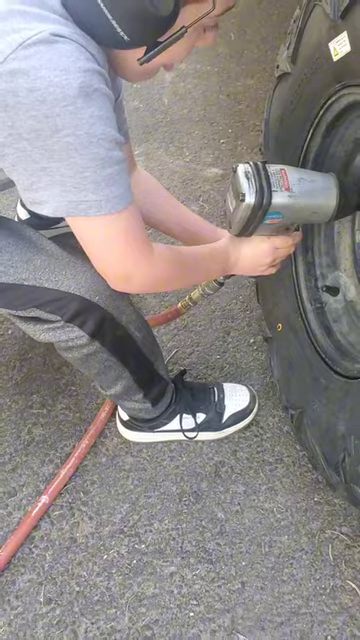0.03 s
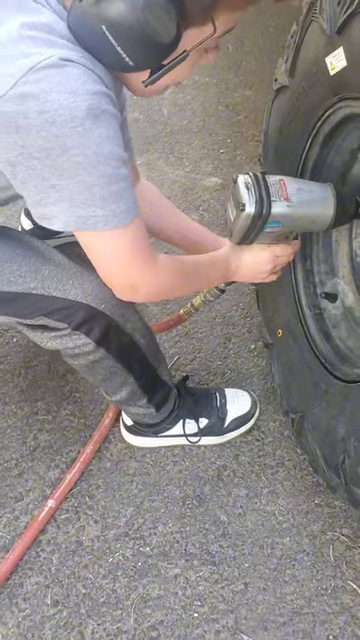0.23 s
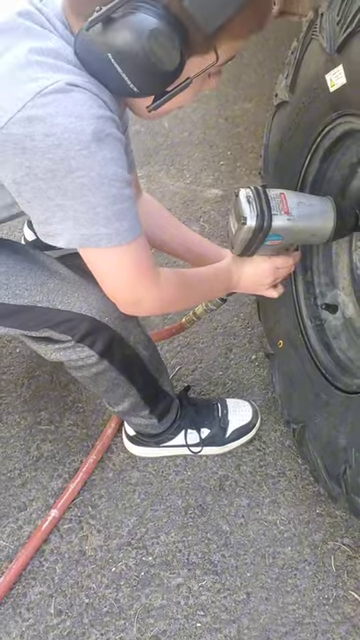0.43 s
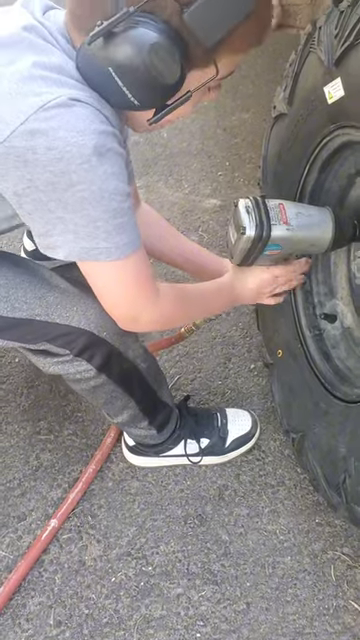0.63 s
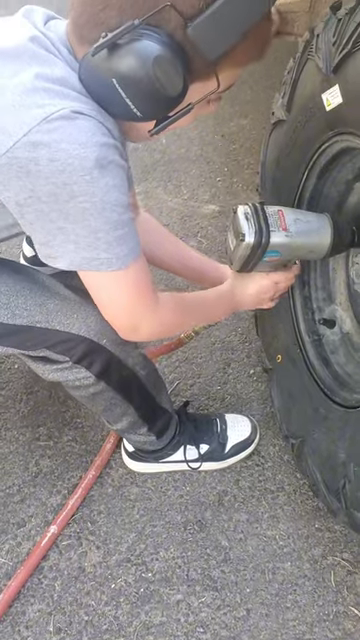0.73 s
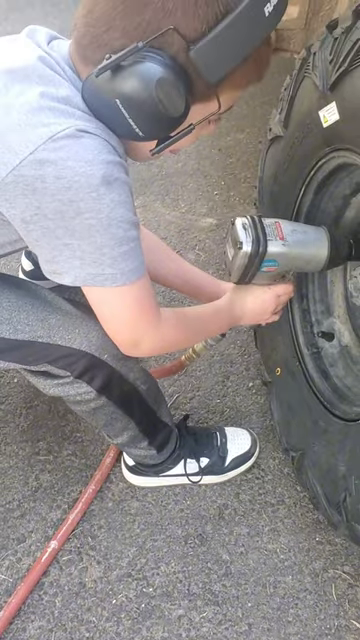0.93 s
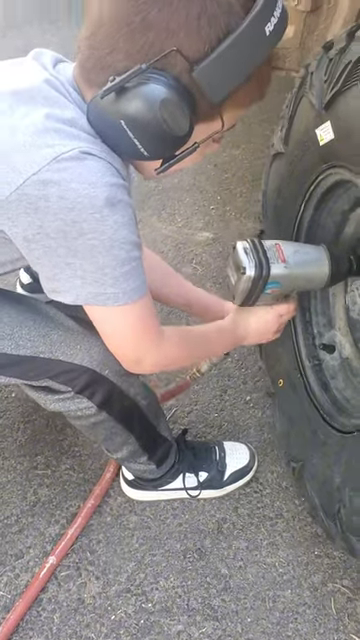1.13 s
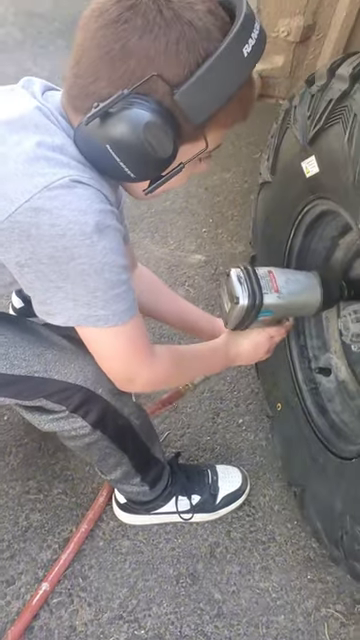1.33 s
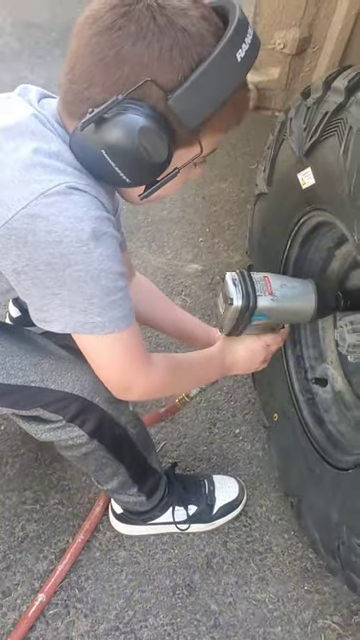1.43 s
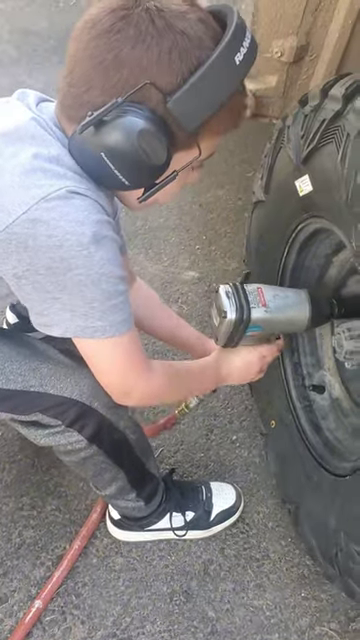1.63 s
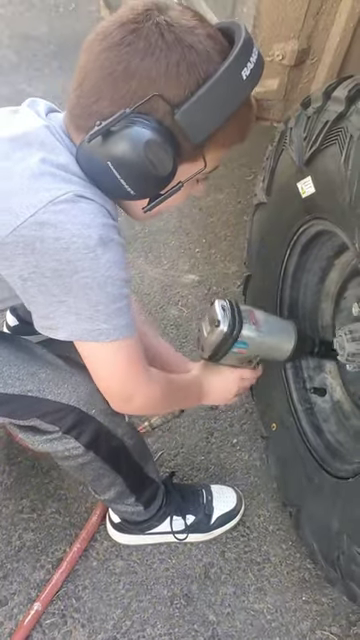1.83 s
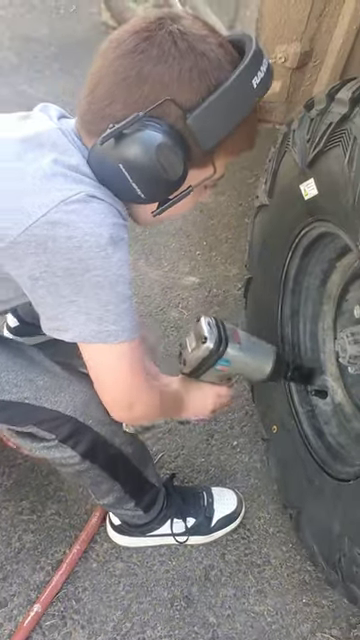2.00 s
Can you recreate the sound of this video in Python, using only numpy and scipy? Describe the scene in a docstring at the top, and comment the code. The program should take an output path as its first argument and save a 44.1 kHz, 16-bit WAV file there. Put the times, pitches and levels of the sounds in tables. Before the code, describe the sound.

An air impact wrench runs once, close by outdoors. The first second holds only light wind and faint, thin distant tones. At about 1 second the wrench spurts air and spins a wheel nut with a loud hiss, a rising whirr and a steel rattle. It cuts off near 1.35 seconds and quickly winds down. Around 2 seconds the socket comes off with a few sharp metal clicks.

```python
"""Outdoors in a yard, close by, an air impact wrench spins a loose wheel nut for a third of a second.
Air hisses out in one puff for each vane (blade) of the motor, and the hammer rattles the steel.
The trigger shuts off the air, the motor coasts, and the socket clicks as it is pulled off.
Behind it are light wind, a distant wash of noise and faint wavering tones."""
import sys
import numpy as np
from scipy import signal
from scipy.fft import rfft, irfft, next_fast_len
from scipy.io import wavfile
from scipy.ndimage import uniform_filter1d, map_coordinates

SR = 44100
rng = np.random.default_rng(int(sys.argv[2]) if len(sys.argv) > 2 else 0)


def unload_audio(sound):
    """Save the sound as a 16-bit wav file, at the path given as the first command line argument."""
    columns = np.transpose(np.atleast_2d(sound))
    # keep every value between -1 and 1, then stretch to whole-number steps
    steps = np.round(np.clip(columns, -1, 1) * 32767)
    wavfile.write(sys.argv[1], SR, steps.astype(np.int16))


N = 90978
T = np.arange(N) / SR

# How strongly the air flows: time_s, level_db
AIR_FLOW = [(.998, -87.5), (1.002, -41), (1.006, -36), (1.014, -13.5), (1.021, -12), (1.027, -29),
            (1.036, -26.5), (1.041, -17), (1.06, -25), (1.09, -18), (1.135, -18.5), (1.155, -15),
            (1.24, -17), (1.29, -17), (1.327, -17.5), (1.336, -33), (1.356, -35.5), (1.39, -61.5)]
# Tone colour of the running hiss and of the first spurt: pitch_hz, level_db
HISS_COLOUR = [(88, -47), (150, -17), (315, -19.5), (361, -7.5), (564, -13.5), (756, -2.5), (1050, -11.5),
               (1300, -9.5), (1900, -6.5), (2700, -3.5), (4200, -8.5), (4630, -4), (6500, -3), (8150, -9.5),
               (9900, -8), (12100, 0.5), (15800, -10.5)]
SPURT_COLOUR = [(250, -29), (600, -13.5), (1230, -24), (1960, -4), (4120, -5.5), (7800, -7), (13800, 2),
                (15800, -8.5)]
# How alike the two ears hear the tool's noise (1 = the same): pitch_hz, likeness
LIKENESS = [(50, 0.26), (170, 1), (800, 0.81), (1500, 0.27), (2200, 0.9), (3200, 0.2), (6200, 0.65),
            (12000, 0.15)]
def exhaust(phase, spin_up_s=1.055, spin_up_length_s=0.038, puff_depth=0.22, flutter_db=0.6):
    """Air spurts out first, then turns into a hiss that puffs once for each passing vane."""
    running = np.clip((T - spin_up_s) / spin_up_length_s, 0, 1)
    hiss = amp(1) * np.sqrt(running) * wheel_echoes(swirl(noise(HISS_COLOUR, LIKENESS)))
    spurt = amp(1.5) * np.sqrt(1 - running) * noise(SPURT_COLOUR, LIKENESS)
    puffs = unit(1 + puff_depth * np.cos(phase))
    return level(AIR_FLOW) * (hiss + spurt) * puffs * amp(flutter_db * wobble(200))


def swirl(jet, depth_db=2):
    """Swirling air makes patches of the hiss louder or softer."""
    spectrum = signal.stft(jet, nperseg=256)[2]
    patches = rng.standard_normal(spectrum.shape[1:])
    patches = uniform_filter1d(patches, size=4, axis=0)  # smooth over pitch
    patches = uniform_filter1d(patches, size=7, axis=1)  # smooth over time
    return unit(signal.istft(spectrum * amp(depth_db * unit(patches)), nperseg=256)[1][:, :N])


def wheel_echoes(jet, count=10, strength=0.7, longest_s=0.014):
    """Quick echoes from rim, tyre and ground boost some pitches and cancel others."""
    delays = rng.uniform(0, longest_s, count)
    echoes = lambda hz: sum(np.exp(-2j * np.pi * hz * delay) for delay in delays)
    return unit(filtered(jet, lambda hz: 1 + strength / np.sqrt(count) * echoes(hz)))


# How often a vane passes: time_s, rate_hz
VANE_RATE = [(1.0, 149.9), (1.065, 293.4), (1.10, 312), (1.12, 378.6), (1.14, 435.8), (1.168, 473.1),
             (1.19, 409.1), (1.225, 374.4), (1.28, 380.3), (1.33, 393.6), (1.37, 324.9), (1.5, 220.5)]
def rotor(unsteady=0.013):
    """The motor turns a little unevenly; gives the vane rate and phase (one cycle a vane)."""
    vane_hz = np.interp(T, *np.transpose(VANE_RATE)) * (1 + unsteady * wobble(120))
    return vane_hz, 2 * np.pi * np.cumsum(vane_hz) / SR


# Loudness of the hum: time_s, level_db
HUM_LEVEL = [(1.06, -49.5), (1.085, -35), (1.15, -28), (1.2, -28.5), (1.3, -30), (1.335, -44), (1.37, -66)]
# Its harmonics, at 1 to 5 times the vane rate: level_db
HARMONICS = [-1, 0.5, -14.5, -11.5, -22]
# How well each pitch gets out of the tool: pitch_hz, gain_db
OUTLET_GAIN = [(100, -30.5), (300, -10), (370, -0.5), (600, 8), (780, -5.5), (950, -4)]
def motor_hum(vane_hz, phase, rough_db=3, smear_rad=0.25):
    """The vane pulses blend into a rough tone that follows the motor's speed."""
    hum = 0
    for k, db in enumerate(HARMONICS, 1):
        gain = amp(db + at_pitch(OUTLET_GAIN, k * vane_hz) + rough_db * wobble(110))
        hum += gain * np.sin(k * phase + smear_rad * wobble(150) + rng.uniform(0, 2 * np.pi))
    return level(HUM_LEVEL) * hum


# Loudness of the housing's shrill note: time_s, level_db
SHRILL_LEVEL = [(1.02, -37.5), (1.105, -29), (1.135, -30.5), (1.176, -22), (1.2, -30.5), (1.285, -21.5),
                (1.297, -30.5), (1.335, -36)]
def housing_shrill(pitch_hz=5900, half_width_hz=550):
    """The housing rings in a narrow, high band that flares up as the tool runs."""
    white = noise([(1, 0)], [(1, 0.65)])
    band = filtered(white, lambda hz: 1 / (1 + ((hz - pitch_hz) / half_width_hz) ** 2))
    return level(SHRILL_LEVEL) * unit(band)


# Notes of the hammer, socket and wheel: pitch_hz, level_db
STEEL_NOTES = [(1313, -4), (1590, -6.5), (1814, -3), (2020, 0.5), (3102, -2.5), (3521, 0), (4020, -1),
               (4566, -1.5), (5404, -1), (5907, 2), (6164, 3.5), (9421, -9), (11662, 1), (12200, -1)]
def steel_ring(t):
    """Struck steel rings with many notes that drop quickly, then linger faintly."""
    decay = fade(t, 0.048) + amp(-33) * fade(t, 0.4)
    return decay * sum(amp(db) * np.sin(2 * np.pi * hz * t + rng.normal(0, 1.0, (2, 1)))
                       for hz, db in STEEL_NOTES)


def hammer_rattle(knocks_per_s=260, scatter_db=6, gain_db=-10.5):
    """Light, uneven hammer knocks keep the steel ringing while the air flows."""
    knocks = (rng.random(N) < knocks_per_s / SR) * amp(scatter_db * rng.standard_normal(N))
    driven = unit(knocks) * level(AIR_FLOW)
    return amp(gain_db) * ring_through(driven[None], steel_ring(T[:SR // 2]))


# Single hard hits: start_s, level_db
HARD_BLOWS = [(1.0873, -19.5), (1.108, -18), (1.2001, -13.5), (1.2266, -12), (1.2869, -17.5),
              (1.323, -15.5), (1.358, -19.5)]
# Tone colour of their clack: pitch_hz, level_db
CLACK_COLOUR = [(200, -13.5), (700, -3), (1400, -6), (3000, 0.5), (4500, -8.5), (15800, -15)]
def hammer_blows(fade_s=0.042, ring_db=-10.5):
    """Now and then the hammer catches hard: a clack that rings the steel."""
    out = 0
    for start_s, db in HARD_BLOWS:
        clack = fade(T - start_s, fade_s) * noise(CLACK_COLOUR, LIKENESS)
        ring = amp(ring_db) * steel_ring(T - start_s) / np.sqrt(len(STEEL_NOTES))
        out += amp(db) * (clack + ring)
    return out


# Tone colour of the coasting motor: pitch_hz, level_db
COAST_COLOUR = [(60, -7), (260, -1.5), (500, -3.5), (900, -15.5), (6500, -22.5), (8000, -32.5),
                (16000, -29.5)]
def coast(phase, release_s=1.341, start_db=-39.5, fall_db_per_s=152.5, pulse_depth=0.64):
    """With the air shut off, the motor whirrs down."""
    t = T - release_s
    dying = (t > 0) * amp(start_db - fall_db_per_s * np.abs(t))
    return dying * noise(COAST_COLOUR, LIKENESS) * unit(1 + pulse_depth * np.cos(phase))


# Loudness of the shaking: time_s, level_db
SHAKE_LEVEL = [(1.012, -61.5), (1.021, -36), (1.05, -41), (1.12, -57.5), (1.23, -50.5), (1.36, -48.5),
               (1.45, -55.5), (1.6, -71)]
# Its tone colour: pitch_hz, level_db
SHAKE_COLOUR = [(25, -23.5), (85, -3), (160, -8.5), (300, -13.5), (700, -44)]
def shudder():
    """The tool and its hose shake with a low rumble."""
    return level(SHAKE_LEVEL) * noise(SHAKE_COLOUR, LIKENESS)


# Handling ticks and socket clicks: start_s, level_db, brightness_db_per_octave, ring_db
CONTACTS = [(.69, -61, 7, -12), (.848, -58, -4, -3), (1.834, -60, -7, -4), (1.9141, -31, -.5, 1),
            (2.0085, -17.5, 1, 4), (2.047, -25.5, -1, 0)]
# Notes of the socket: pitch_hz, level_db, fade_s
SOCKET_NOTES = [(777, -17.5, 0.072), (1198, -21.5, 0.031), (1935, -9, .02), (2630, 0.5, 0.014),
                (2520, -22, 0.075), (4030, -20, 0.039), (5750, -23.5, 0.03), (6940, -33.5, 0.07),
                (9400, -46, .2)]
# Tone colour of the crack: pitch_hz, level_db
CRACK_COLOUR = [(150, -24.5), (700, 1.5), (1000, -11), (2000, -2), (2700, 8), (3300, -10.5), (6000, -11.5),
                (8000, -21.5), (12000, -17), (16000, -31)]
def socket_clicks(contact_s=0.0009):
    """Metal meets metal: a sharp crack with a faint tail, and a short ring."""
    out = np.zeros((2, N))
    for start_s, db, brightness, ring_db in CONTACTS:
        t = T - start_s
        ring = sum(amp(note_db + rng.standard_normal()) * fade(t, fade_s) * np.sin(2 * np.pi * hz * t)
                   for hz, note_db, fade_s in SOCKET_NOTES)
        decay = amp(-6.5) * fade(t, 0.021) + amp(-19) * fade(t, 0.11)
        crack = noise(CRACK_COLOUR, LIKENESS) * decay
        attack = 1 - np.exp(-(t / contact_s) ** 2)
        click = attack * (crack + amp(ring_db) * ring)
        out += amp(db) * filtered(click, lambda hz: amp(brightness * np.log2((hz + 500) / 3000)))
    return out


# The yard's echo: pitch_hz, fade_s, level_db
YARD_ECHO = [(212, 1.2, -20), (477, 0.24, -29), (3500, 0.26, -31.5), (14000, 0.13, -36)]
def yard_echo(sound):
    """The yard answers with a faint echo in which the low notes last longest."""
    rows = np.array(YARD_ECHO)
    hz, t, spectrum = signal.stft(rng.standard_normal((2, SR)), SR, nperseg=256)
    fade_s = at_pitch(rows[:, :2], hz)[:, None]
    tail = signal.istft(spectrum * fade(t, fade_s), SR, nperseg=256)[1]
    return filtered(ring_through(sound, tail), lambda f: amp(at_pitch(rows[:, ::2], f)))


# Loudness of the background: time_s, wind_db, wash_db, hiss_db
BACKGROUND_LEVELS = [(0, -29, -57, -60), (.1, -64.5, -61.5, -65.5), (.39, -57, -60.5, -67),
                     (.43, -75, -63.5, -72.5), (0.652, -66, -60.5, -78), (.98, -70, -58.5, -80),
                     (1.4, -71.5, -71, -89), (1.62, -70, -80, -100), (1.88, -72.5, -79.5, -115),
                     (1.93, -70, -65, -73), (2.06, -60.5, -68, -81)]
# Tone colour of each of the three: pitch_hz, level_db
WIND_COLOUR = [(20, -15.5), (54, 7.5), (97, 3), (130, -14.5), (200, -17), (400, -47.5)]
WASH_COLOUR = [(60, -17.5), (120, -9.5), (555, -2), (1320, -11), (2800, -24), (5500, -47.5)]
THIN_HISS_COLOUR = [(1060, -33.5), (1800, -3.5), (6540, -3), (7640, -14), (8830, -12.5), (15800, -6.5)]
def background(gust_db=3):
    """Light wind rumbles in gusts over a distant wash and a thin hiss."""
    times, *columns = np.transpose(BACKGROUND_LEVELS)
    wind_db, wash_db, hiss_db = [np.interp(T, times, column) for column in columns]
    wind = amp(wind_db + gust_db * wobble(24)) * noise(WIND_COLOUR, [(1, -0.2)])
    wash = amp(wash_db) * noise(WASH_COLOUR, [(1, 0.58)])
    hiss = amp(hiss_db) * noise(THIN_HISS_COLOUR, [(1, 0.16)])
    return (wind + wash + hiss) * lean_left(3.5)


# Faint far-off tones: middle_s, half_length_s, pitch_hz, level_db
FAR_TONES = [(.22, 0.14, 1155, -59.5), (.55, 0.17, 1159, -65.5), (.62, 0.25, 819.3, -60),
             (.77, 0.1, 1806, -72), (.92, 0.15, 1146, -64), (1.63, .1, 1150, -74)]
def far_tones(waver_db=1):
    """Thin tones of steady pitch swell, waver and fade in the distance."""
    out = 0
    for middle_s, half_length_s, hz, db in FAR_TONES:
        swell = np.exp(-((T - middle_s) / half_length_s) ** 2)
        out += amp(db + waver_db * wobble(25)) * swell * np.sin(2 * np.pi * hz * T)
    return out


def amp(db):
    """Turn decibels into a number to multiply by."""
    return 10 ** (np.asarray(db) / 20)


def unit(x):
    """Scale a signal to an average strength (rms) of 1."""
    return x / np.sqrt(np.mean(x ** 2) + 1e-20)


def at_pitch(rows, hz):
    """Read between (pitch_hz, value) rows on a musical (log) scale."""
    pitches, values = np.transpose(rows)
    return np.interp(np.log(hz + 1), np.log(pitches + 1), values)


def level(rows):
    """A loudness curve through (time_s, level_db) rows, silent outside them."""
    return amp(np.interp(T, *np.transpose(rows), left=-np.inf, right=-np.inf))


def fade(t, fade_s):
    """Start at t = 0 and die away by 60 dB every fade_s seconds."""
    return (t >= 0) * np.exp(-np.log(1000) * np.abs(t) / fade_s)


def wobble(points_per_s):
    """A smooth curve through random points."""
    return map_coordinates(rng.standard_normal(2048), [T * points_per_s], mode="wrap")


def lean_left(db):
    """Left and right gains that make the left louder by db."""
    return amp(db * np.array([[0.5], [-0.5]]))


def filtered(x, response):
    """Turn each pitch up or down by response(hz)."""
    size = next_fast_len(N + SR // 2)
    return irfft(rfft(x, size) * response(np.fft.rfftfreq(size, 1 / SR)), size)[..., :N]


def ring_through(x, tail):
    """Let every sample of x set off a copy of the tail."""
    return signal.fftconvolve(x, tail / np.linalg.norm(tail[0]), axes=1)[:, :N]


def noise(colour, likeness):
    """Stereo noise with a given tone colour and likeness between the ears."""
    def shape(hz):
        spread = np.arccos(np.clip(at_pitch(likeness, hz), -1, 1)) / 2
        return amp(at_pitch(colour, hz)) * [np.cos(spread), np.sin(spread)]
    mid, side = filtered(rng.standard_normal((2, N)), shape)
    return unit(np.array([mid + side, mid - side]))


# How much louder the wrench is in the left ear: pitch_hz, extra_db
LEFT_EXTRA = [(500, 2), (2000, 2), (7000, 0.3)]
def scene():
    """The wrench, slightly to the left, in the yard."""
    vane_hz, phase = rotor()
    wrench = shudder() + exhaust(phase) + motor_hum(vane_hz, phase) + housing_shrill()
    wrench = wrench + hammer_rattle() + hammer_blows() + coast(phase) + socket_clicks()
    wrench = filtered(wrench, lambda hz: lean_left(at_pitch(LEFT_EXTRA, hz)))
    return wrench + yard_echo(wrench) + background() + far_tones()


def record(dry, top_hz=15850):
    """Round off the tallest peaks and cut the very highest treble."""
    rounded = dry / (1 + dry ** 6) ** (1 / 6)
    return filtered(rounded, lambda hz: np.clip((top_hz - hz) / 300 + 0.5, 0, 1) ** 2)


dry = scene()
out = record(dry)
unload_audio(out)
```